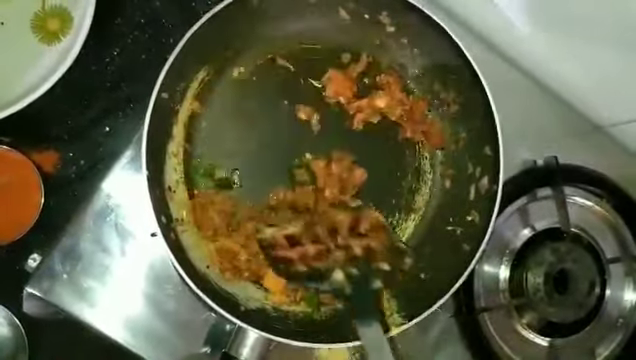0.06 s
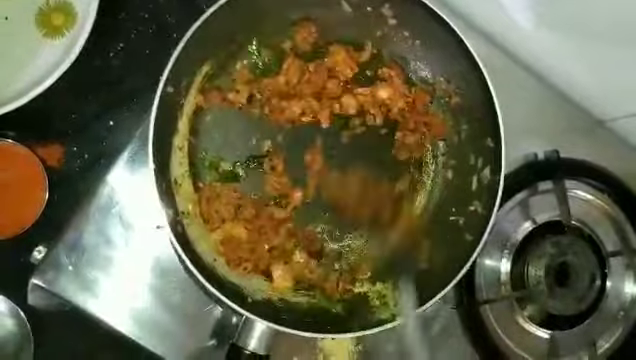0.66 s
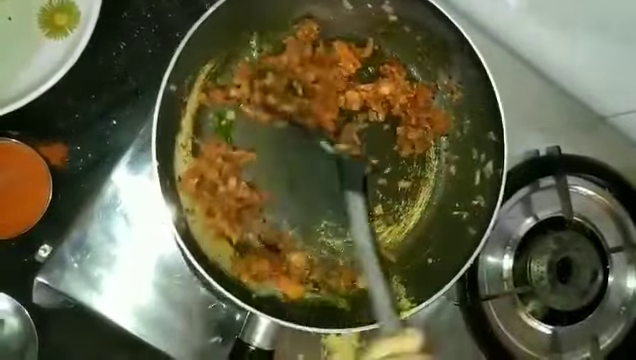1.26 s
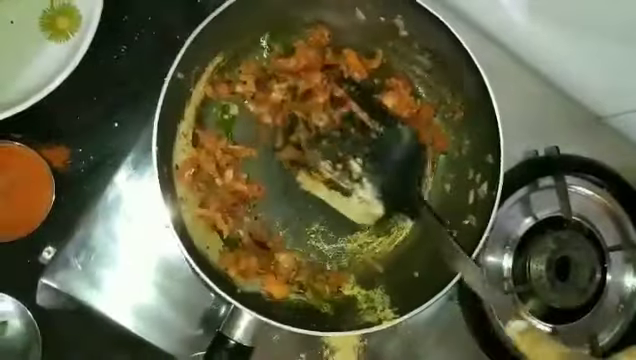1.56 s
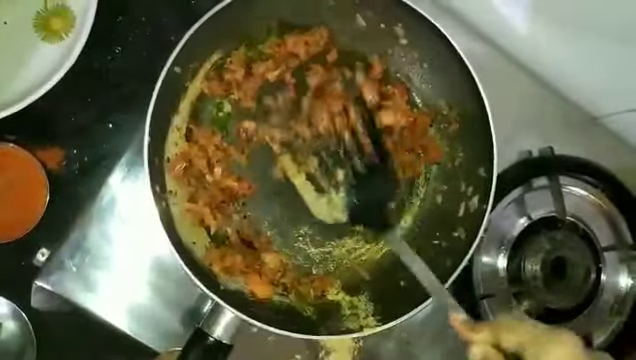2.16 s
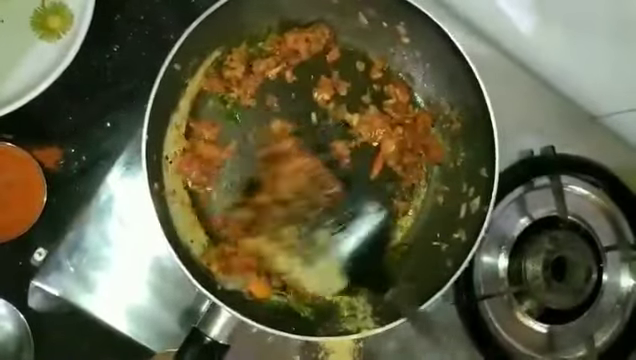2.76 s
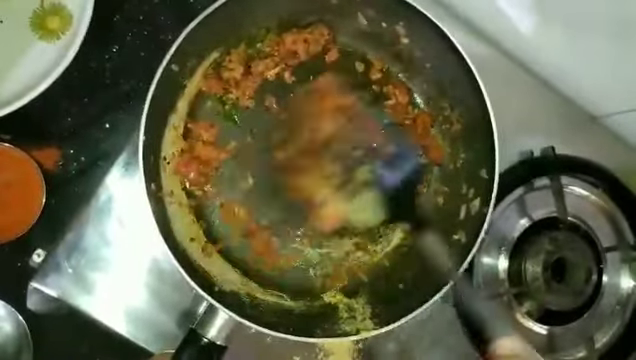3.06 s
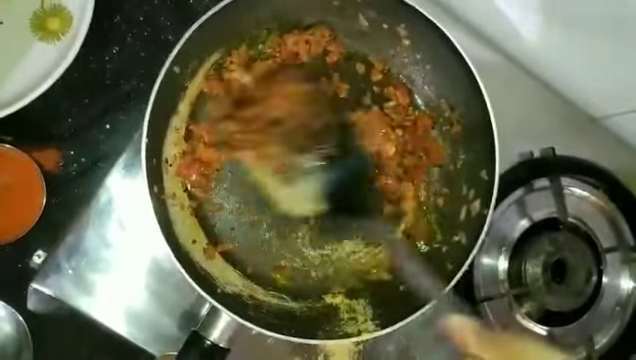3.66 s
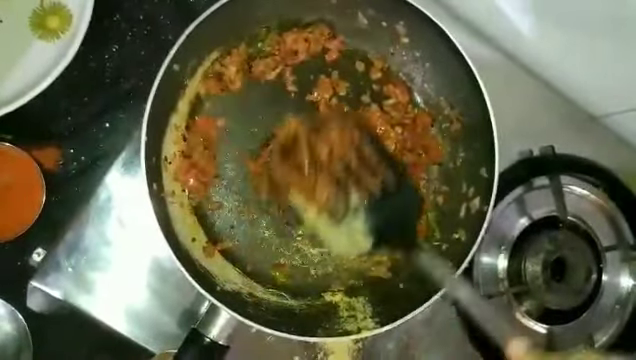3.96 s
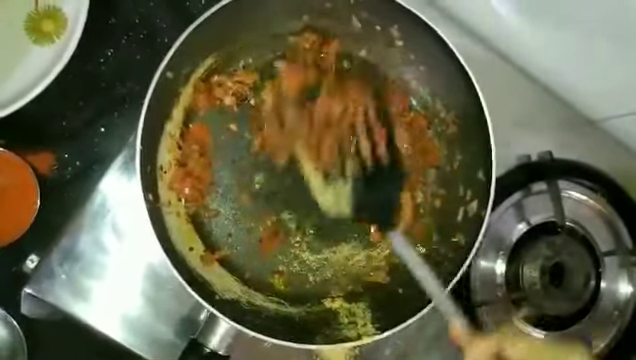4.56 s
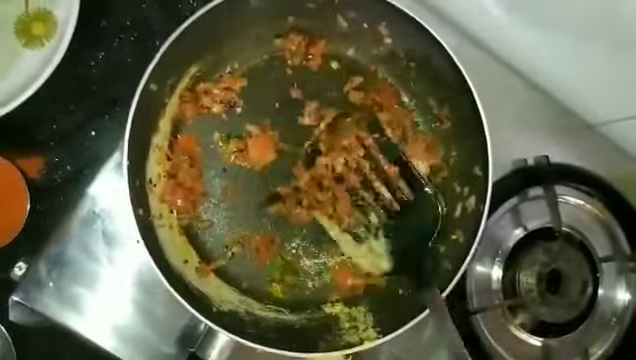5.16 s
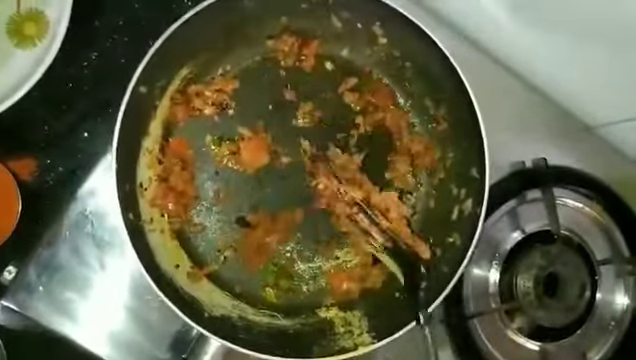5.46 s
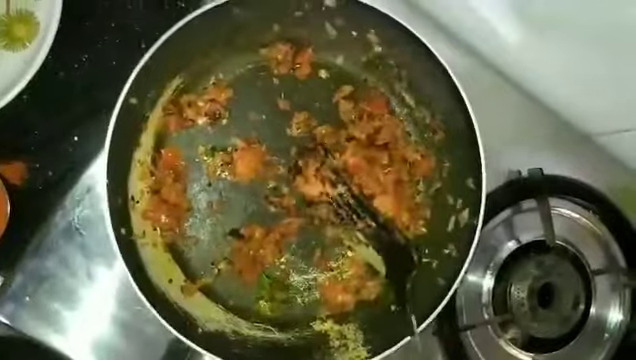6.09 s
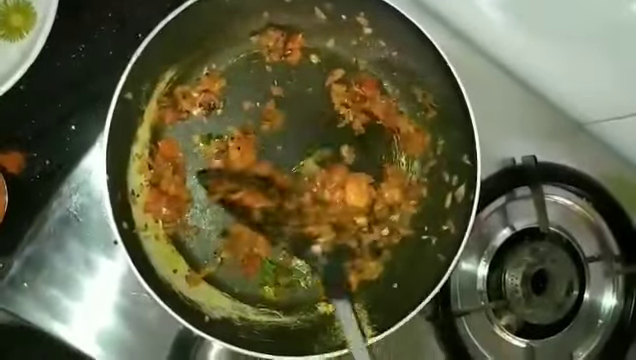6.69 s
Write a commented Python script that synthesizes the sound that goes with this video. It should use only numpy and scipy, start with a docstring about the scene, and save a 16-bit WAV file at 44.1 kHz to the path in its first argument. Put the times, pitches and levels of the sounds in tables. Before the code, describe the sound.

A spatula stirs thick masala in a frying pan, heard close up in stereo in a small, hard-walled kitchen. It opens with a knock and a short scrape, followed by lighter strokes and soft, wet plops of paste during the first second or so, over a fine sizzle of oil. From about 2 seconds the blade taps and drags irregularly, making the pan ring briefly. Between 2.4 and 4.5 seconds the frying swells in repeated crackling, squelching surges. A harder knock and scrape come near 4.8 seconds. The loudest part is a quick run of bright clanks and scrapes from 5.3 to 6 seconds, with a burst of sizzling, leaving a low ring fading in the pan. After a few light taps, a last knock and scrape land around 6.8 seconds. A soft gas burner rumble and a faint motor hum continue throughout.

```python
"""A slotted spatula stirs thick masala in a non-stick frying pan, close to a stereo pair of microphones.
The blade knocks and scrapes, ringing the pan's base, wall and rim; the paste squelches as it is
pushed, and steam crackles in the hot oil. The place is a small kitchen with hard walls close by.
Underneath are the soft rumble of the gas burner and a faint motor hum."""
import sys
import numpy as np
from scipy import signal
from scipy.fft import rfft, irfft
from scipy.io import wavfile

SR = 44100
rng = np.random.default_rng(int(sys.argv[2]) if len(sys.argv) > 2 else 0)


def store_pcm(level_fs):
    """Save levels as 16-bit WAV."""
    pcm = np.round(np.clip(level_fs, -1, 1) * 32767).astype(np.int16)
    wavfile.write(sys.argv[1], SR, np.atleast_2d(pcm).T)


N = 305613
TIME = np.arange(N) / SR


def undb(db):
    """Decibels to gain."""
    return 10 ** (np.asarray(db) / 20)


def unit(x):
    """Scale to rms 1."""
    return x / np.sqrt(np.mean(x ** 2))


def butter(x, hz, kind, order=2):
    """Butterworth filter."""
    return signal.sosfilt(signal.butter(order, hz, kind, fs=SR, output="sos"), x)


def through(x, response):
    """Convolve, keeping the length."""
    return signal.fftconvolve(np.atleast_2d(x), np.atleast_2d(response), axes=1)[:, :x.shape[-1]]


def body(colour, modes=(), size=8192):
    """Impulse response of a broad colour with resonances standing on it."""
    hz = np.fft.rfftfreq(size, 1 / SR)
    points_hz, db = np.transpose(colour)
    broad = undb(np.interp(np.log(hz + 1), np.log(points_hz), db))
    peaks = sum((undb(lift_db) ** 2 - 1).clip(0) / (1 + (2 * (hz - pitch_hz) / width_hz) ** 2)
                for pitch_hz, width_hz, lift_db in modes)
    cepstrum = irfft(np.log(broad * np.sqrt(1 + peaks)))
    cepstrum[1:size // 2] *= 2  # folded for minimum phase
    cepstrum[size // 2:] = 0
    return irfft(np.exp(rfft(cepstrum)))[:size // 2]


def stereo_noise(size, apart_hz=760, bass_side=0.11):
    """Noise at the two microphones: alike in the bass, unrelated in the treble."""
    mid, side, spill = rng.standard_normal((3, size))
    side = butter(side, apart_hz, "high") + bass_side * butter(spill, apart_hz, "low")
    return np.array([mid + side, mid - side])


def wander(rate_hz):
    """Random values joined by straight lines."""
    knots = rng.standard_normal(int(N / SR * rate_hz) + 2)
    return np.interp(TIME * rate_hz, np.arange(len(knots)), knots)


def clicks(per_s, spread_db):
    """Random clicks: many small, a few large."""
    where, strength, sign = rng.random((int(per_s * N / SR), 3)).T
    height = undb(spread_db * np.minimum(-np.log(1 - strength), 5)) * np.sign(sign - .5)
    return unit(np.bincount((where * N).astype(int), height, N))


def swells(events, rest_db, rise_s, fade_s):
    """Level in dB of swells that build to a crest and die away, over a resting level."""
    power = undb(rest_db) ** 2
    for crest_s, level_db in events:
        t = TIME - crest_s
        shape = np.exp(-(t.clip(None, 0) / rise_s) ** 2 - t.clip(0) / fade_s)
        power = power + (undb(level_db) * shape) ** 2
    return 10 * np.log10(power)


def kitchen(x, wet_db, t60_low_s=0.46, t60_high_s=0.35, build_s=0.0011):
    """Hard walls near the microphones add a short, dense tail that loses its treble first."""
    t = TIME[:SR * 3 // 4]
    noise = stereo_noise(len(t))
    low = butter(noise, 2800, "low", order=1)
    tail = low * undb(-60 * t / t60_low_s) + (noise - low) * undb(-60 * t / t60_high_s)
    tail *= 1 - np.exp(-t / build_s)
    return x + undb(wet_db) * through(x, unit(tail) / np.sqrt(len(t)))


# Motor tones in the background of the kitchen: pitch_hz, level_db
HUM_TONES = [(100, -60.5), (161.5, -55.5), (323, -68)]
def motor_hum():
    """A motor hums faintly, each tone wavering in level and phase."""
    hum = 0
    for pitch_hz, level_db in HUM_TONES:
        amplitude = np.sqrt(2) * undb(level_db + 0.98 * wander(4.19))
        hum += amplitude * np.sin(2 * np.pi * pitch_hz * TIME + 0.24 * wander(3.17))
    return hum


# Spectrum of the flame under the pan: frequency_hz, gain_db
FLAME_COLOUR = [(20, -27), (45, -1), (70, 4), (130, 3.5), (200, -1.5), (280, 7.5), (450, -2), (800, -11),
                (2000, -34), (6000, -23)]
def gas_burner(level_db=-52):
    """The flame rumbles softly and almost steadily."""
    rumble = unit(through(stereo_noise(N), body(FLAME_COLOUR)))
    return rumble * undb(level_db + 0.33 * wander(7.8))


def crackle(per_s, spread_db, flicker_db, flicker_hz, spots, path_decay_s=0.00031):
    """Clicks reach the microphones from spots all over the pan, each spot flaring up on its own."""
    fade = np.exp(-TIME[:192] / path_decay_s)
    out = 0
    for _ in range(spots):
        bursts = clicks(per_s / spots, spread_db) * undb(flicker_db * wander(flicker_hz))
        out += through(bursts, stereo_noise(len(fade)) * fade)
    return out


def bubbles(per_s, low_hz, high_hz, spread_db, decay_s=.004, size=512):
    """Steam pockets open and ring briefly; each one's place sets its phase between the microphones."""
    when, pitch, strength, place = rng.random((int(per_s * N / SR), 4)).T[:, :, None]
    t = TIME[:size]
    fade = undb(spread_db * np.minimum(-np.log(1 - strength), 4)) * np.exp(-t / decay_s)
    phase = 2 * np.pi * (low_hz + (high_hz - low_hz) * pitch) * t
    index = ((when * N).astype(int) + np.arange(size)).ravel()
    pair = [np.bincount(index, (fade * np.sin(phase + lag)).ravel(), N + size)[:N]
            for lag in (0, 2 * np.pi * place)]
    return unit(np.array(pair))


# Surges of frying as wet paste is spread on bare hot metal: crest_s, level_db
FRYING_SURGES = [(.25, -42.5), (.48, -41), (.92, -36.5), (1.35, -51), (1.7, -44), (2.08, -43),
                 (2.44, -32.5), (2.87, -30.5), (3.26, -31.5), (3.7, -34.5), (4.14, -37), (4.52, -37),
                 (5.8, -30), (6.52, -45.5)]
def frying_levels(start_db=-45, drying_db_per_s=-0.41):
    """The frying's level, and its rise above a simmer that sinks as the masala dries; both in dB."""
    simmer_db = start_db + drying_db_per_s * TIME
    frying_db = swells(FRYING_SURGES, simmer_db, rise_s=0.095, fade_s=.11)
    return frying_db, frying_db - simmer_db


# Spectrum of the hot oil from close by: frequency_hz, gain_db
OIL_COLOUR = [(500, -22), (2500, -10.5), (4500, -4), (7000, -0.5), (9500, 6.5), (12000, 4), (15500, 0.5)]
def sizzle(level_db, fizz_db=-2):
    """Steam crackles and fizzes in the oil."""
    fizz = bubbles(per_s=1000, low_hz=2200, high_hz=15000, spread_db=1.5)
    pops = unit(crackle(per_s=11000, spread_db=2.5, flicker_db=4.5, flicker_hz=16, spots=4))
    return unit(through(pops + undb(fizz_db) * fizz, body(OIL_COLOUR))) * undb(level_db)


# Resonances of the pan: pitch_hz, width_hz, lift_db
PAN_MODES = [(264.6, 25, 18), (385, 13, 12), (454.5, 16, 16), (725, 40, 11.5), (857, 176, 10),
             (975, 12, 16.5), (985, 170, 11.5), (1285, 72, 12.5), (1800, 57, 5.5), (2037, 28, 8.5),
             (2470, 35, 9), (3274, 25, 11.5), (4120, 11, 11.5), (5185, 22, 13), (5540, 33, 7.5),
             (6540, 140, 10.5), (7160, 45, 10), (8460, 45, 2), (8640, 56, 12.5), (8500, 23, 15),
             (10060, 45, 10.5), (11000, 55, 8)]
# Broad spectrum of the pan from close by: frequency_hz, gain_db
PAN_COLOUR = [(25, -14), (60, 4), (150, -10.5), (230, -4), (330, -3.5), (600, -8.5), (1200, 1.5),
              (2600, 0.5), (4000, 3.5), (7000, 3.5), (10000, 7), (13000, 1.5), (16000, -5.5)]
# Borders between base, wall, rim and blade edge: frequency_hz
CROSSOVERS_HZ = [546, 1720, 6000]
def pan_parts(detune=0.0035, touch_db=2.0, minor_width_hz=70, minor_db=7, minor_count=26):
    """Responses of base, wall, rim and blade edge; each touch shifts the modes' pitch and strength."""
    chance = rng.standard_normal((len(PAN_MODES), 2))
    modes = [(pitch_hz * (1 + detune * shift), width_hz, lift_db + touch_db * touch)
             for (pitch_hz, width_hz, lift_db), (shift, touch) in zip(PAN_MODES, chance)]
    # each spot also wakes its own few of the many minor modes
    modes += [(1400 + 13000 * u ** 1.3, minor_width_hz, minor_db) for u in rng.random(minor_count)]
    rest, parts = body(PAN_COLOUR, modes, size=4096), []
    for hz in CROSSOVERS_HZ:
        parts.append(butter(rest, hz, "low", order=4))
        rest = butter(rest, hz, "high", order=4)
    return parts + [rest]


# Spectrum of the wet smacks: frequency_hz, gain_db
SMACK_COLOUR = [(100, -6), (260, 1), (600, 0.5), (1200, 5.5), (2000, 5), (3500, 3), (8000, 5.5),
                (15000, -13)]
# Clumps dropping off the blade: crest_s, level_db
PASTE_CLUMPS = [(.3, -41.5), (.57, -42), (.76, -43.5), (.92, -50), (1.08, -41.5), (1.4, -52)]
def squelch(surge_db, rest_db=-60.5, surge_share=0.41, plop_db=-5):
    """Wet paste smacks and plops against the pan, louder as it is spread and as clumps fall."""
    plops = bubbles(per_s=220, low_hz=700, high_hz=2200, spread_db=2)
    smacks = crackle(per_s=1100, spread_db=1.0, flicker_db=5.5, flicker_hz=41, spots=2)
    low_modes = [mode for mode in PAN_MODES if mode[0] < 3000]  # soft paste shakes only these
    paste = unit(through(smacks, body(SMACK_COLOUR, low_modes))) + undb(plop_db) * plops
    level_db = swells(PASTE_CLUMPS, rest_db + surge_share * surge_db, rise_s=0.087, fade_s=0.055)
    return unit(paste) * undb(level_db)


# The blade lifts and leaves the base free: start_s, level_db
BLADE_LIFTS = [(3.268, -49), (4.08, -64), (6.048, -37)]
def base_ring(pitch_hz=274, t60_s=1.26, rise_s=0.034):
    """The pan's lowest mode sings on after the blade lets go."""
    out = 0
    for start_s, level_db in BLADE_LIFTS:
        t = (TIME - start_s).clip(0)
        envelope = (1 - np.exp(-t / rise_s)) * undb(level_db - 60 * t / t60_s)
        out += envelope * np.sin(2 * np.pi * pitch_hz * t)
    return np.sqrt(2) * out


# Gain for each dB of brightness: base_db, wall_db, rim_db, edge_db
BRIGHTNESS_TILT = (-1.25, -0.38, 0.37, 1.98)
def part_levels(level_db, brightness_db, balance_db):
    """Share a contact among the four parts: a bare blade edge is bright, a paste-coated face dull."""
    return level_db + np.array(balance_db) + brightness_db * np.array(BRIGHTNESS_TILT)


# The blade drags over the pan: start_s, length_s, level_db, brightness_db, swell_db
BLADE_STROKES = [ (0.087, 0.049, -33.5, 1, 5), (0.373, 0.11, -39.5, -1.5, 11), (0.686, 0.085, -48, 1.5, -4),
                 (1.02, 0.07, -47, 0.5, -2), (1.573, 0.076, -40.5, -4.5, 3),
                 (1.965, 0.022, -36.5, -2.5, -6), (2.412, 0.045, -37.5, -2, -1), (2.726, 0.07, -47, 2, 4),
                 (3.225, 0.1, -41.5, -1, 1), (3.589, 0.11, -44.5, -3.5, 2),
                 (4.005, 0.072, -38.5, -1.5, 9.5), (4.83, 0.043, -27, -8.5, -3),
                 (4.853, 0.059, -23.5, 0.5, -6), (4.897, 0.045, -32, -4.5, 0),
                 (5.25, 0.027, -35.5, -1.5, 9), (5.309, 0.065, -28.5, -0.5, -5),
                 (5.405, 0.17, -33.5, -2, -5), (5.596, 0.041, -18.5, 3.5, -2),
                 (5.641, 0.051, -19.5, -0.5, -5), (5.697, 0.071, -30.5, -3.5, -6),
                 (5.781, 0.16, -26, -1, -8), (5.938, 0.11, -29, -0.5, 3.5), (6.407, 0.095, -46.5, -6, 5),
                 (6.785, 0.061, -44, -2, 6), (6.832, 0.14, -31.5, 0.5, 0)]
def spatula_scrapes(chatter_db=1.7, grip=0.43, path_decay_s=0.0026, base_lag_s=0.00803, size=1024):
    """The blade sticks and slips, driving the pan as pressure swells and eases along each stroke."""
    slips = clicks(per_s=2600, spread_db=2.0) * undb(chatter_db * wander(130))
    out = np.zeros((2, N + SR))
    for start_s, length_s, level_db, brightness_db, swell_db in BLADE_STROKES:
        levels = part_levels(level_db, brightness_db, balance_db=(0, -6, -0.5, 0.5))
        start, length = int(start_s * SR), int(length_s * SR)
        along = np.arange(length) / length
        pressure = np.sin(np.pi * along) ** grip * undb(swell_db * along)
        force = np.take(slips, start + np.arange(length), mode="wrap") * pressure
        # every stroke crosses another part of the pan, with its own paths to the microphones
        paths = stereo_noise(size) * np.exp(-TIME[:size] / path_decay_s)
        rub = through(np.pad(force, (0, 2 * size)), paths)
        for part, db, lag_s in zip(pan_parts(), levels, (base_lag_s, 0, 0, 0)):
            ring = through(rub, part)
            rms = np.sqrt(np.sum(ring ** 2, axis=1, keepdims=True) / length)
            at = start + int(lag_s * SR)  # the heavy base answers last
            out[:, at:at + ring.shape[1]] += undb(db) * ring / rms
    return out[:, :N]


# The blade strikes the pan, close to the microphones: start_s, level_db, brightness_db, wall_clank_db
BLADE_KNOCKS = [ (0.1203, -26, 1.5, -3.5), (0.442, -33, -3.5, -1), (1.3125, -53, -4.5, 7),
                (1.5975, -44, 4.5, 9), (1.968, -36, -0.5, -5), (1.984, -28.5, 2, 1), (2.324, -41.5, -7, 4),
                (2.3685, -34.5, -2, -4), (2.3992, -32, 0.5, -2.5), (2.7077, -44, -1.5, 1.5),
                (2.7580, -35, -0.5, -6), (3.1256, -38.5, 0, 0), (3.219, -37, 3.5, -16),
                (3.6213, -41, 0, 2.5), (4.0400, -37.5, -4.5, -4), (4.066, -39, -4.5, -4),
                (4.4193, -35, -1.5, 3), (4.815, -30.5, -1, -0.5), (4.8301, -29, -2, 4.5),
                (5.2752, -27, 0, 15), (5.4345, -23.5, 3, 9), (5.5675, -29, 2, -5), (5.599, -23.5, 8.5, 8.5),
                (5.7712, -16, 2.5, 2.5), (5.826, -26, 1.5, 3.5), (5.898, -25, 1, -17),
                (5.9291, -20.5, 2, 2), (6.133, -40, -4, 2), (6.4669, -43, -0.5, 2), (6.843, -26.5, 0, -2.5)]
def spatula_knocks(rises_s=(.005, .0006, .0008, .0008), decays_s=(.02, .008, .0055, .0055),
                   bare_db=-36, cushion_s_per_db=0.00071, size=6144, attack_samples=1100):
    """Blows on the pan: the heavy base answers last and longest; paste slows the weak blows."""
    out, t = np.zeros((2, N + size)), TIME[:size]
    for start_s, level_db, brightness_db, wall_clank_db in BLADE_KNOCKS:
        levels = part_levels(level_db, brightness_db, balance_db=(-2, wall_clank_db, 1.5, -4))
        rim_db = levels[2]
        cushion_s = cushion_s_per_db * max(bare_db - rim_db, 0)
        start = int(start_s * SR)
        contact = stereo_noise(size)
        for part, db, rise_s, decay_s in zip(pan_parts(), levels, rises_s, decays_s):
            envelope = (1 - np.exp(-t / (rise_s + cushion_s))) * np.exp(-t / (decay_s + cushion_s))
            ring = through(contact * envelope, part)
            attack_rms = ring[:, :attack_samples].std(axis=1, keepdims=True)
            out[:, start:start + size] += undb(db) * ring / attack_rms
    return out[:, :N]


def scene():
    """At the hob in a small kitchen: spatula and frying up close, flame and motor underneath."""
    blade = spatula_knocks() + spatula_scrapes()
    pan = butter(blade, 130, "high", order=3)  # the blade's sounds carry no deep bass
    spatula = kitchen(pan, wet_db=-4.0)
    frying_db, surge_db = frying_levels()
    frying = kitchen(sizzle(frying_db) + squelch(surge_db), wet_db=-1.5)
    return spatula + frying + base_ring() + gas_burner() + motor_hum()


def record(dry, bass_tilt_db=1, treble_tilt_db=0.5, top_hz=15800):
    """The right microphone takes more bass, the left more treble; peaks are rounded, the top is cut."""
    leftward = np.array([[1], [-1]])
    bass_tilt = butter(dry, 270, "low", order=1) * (undb(-bass_tilt_db * leftward) - 1)
    treble_tilt = butter(dry, 12000, "high", order=1) * (undb(treble_tilt_db * leftward) - 1)
    rounded = np.tanh(dry + bass_tilt + treble_tilt)
    return signal.sosfilt(signal.ellip(10, .2, 80, top_hz, fs=SR, output="sos"), rounded)


dry = scene()
out = record(dry)
store_pcm(out)
```